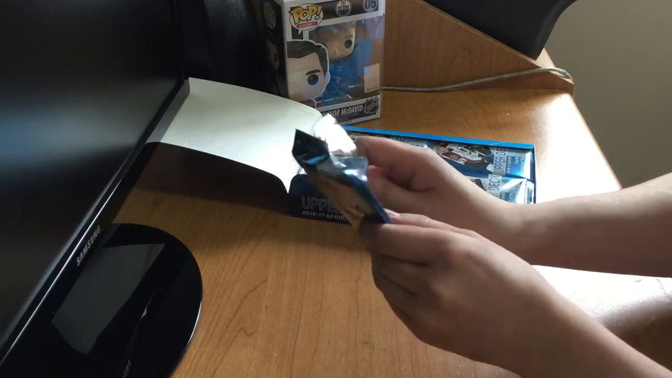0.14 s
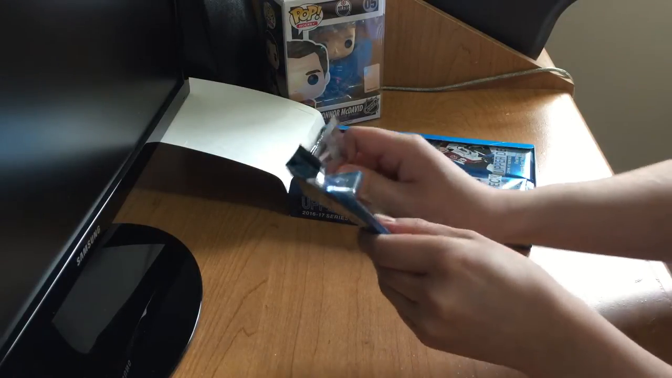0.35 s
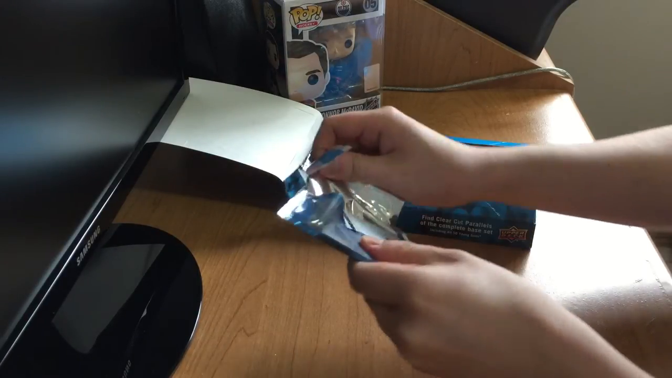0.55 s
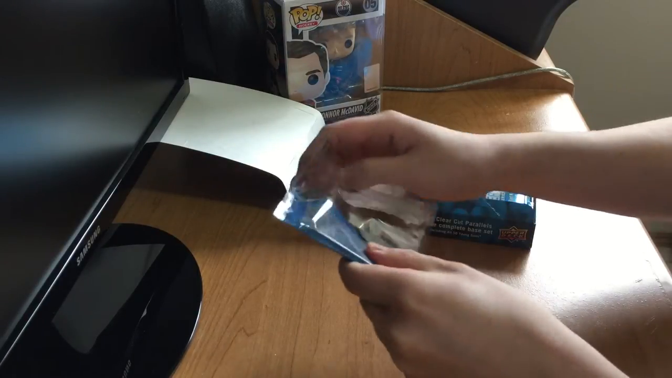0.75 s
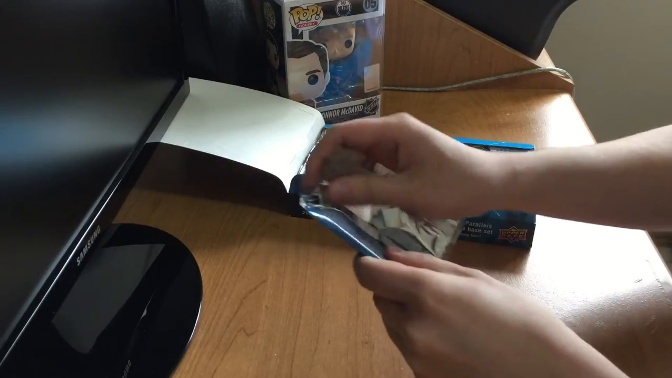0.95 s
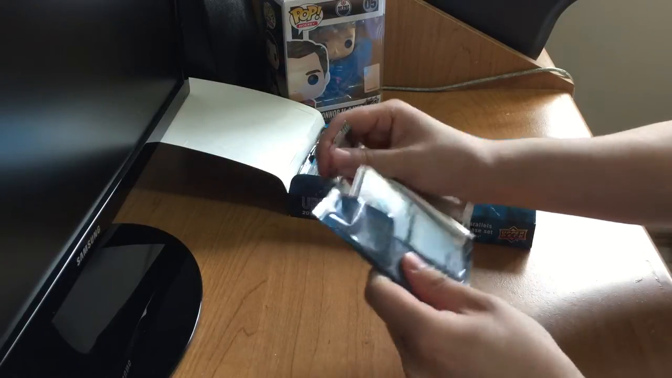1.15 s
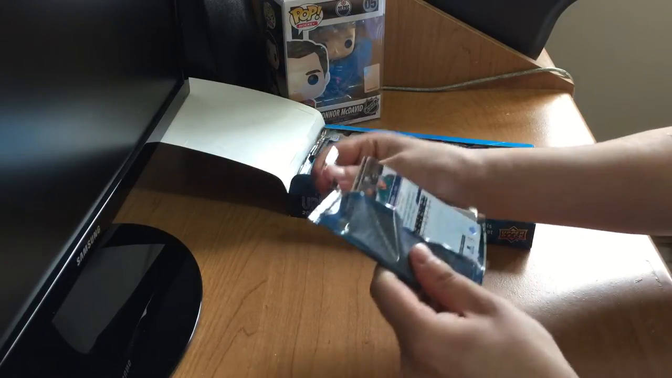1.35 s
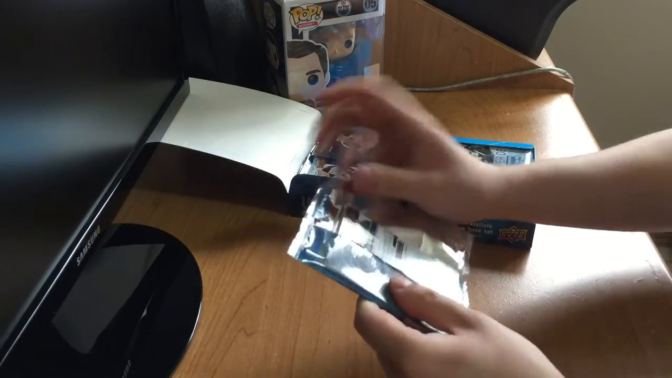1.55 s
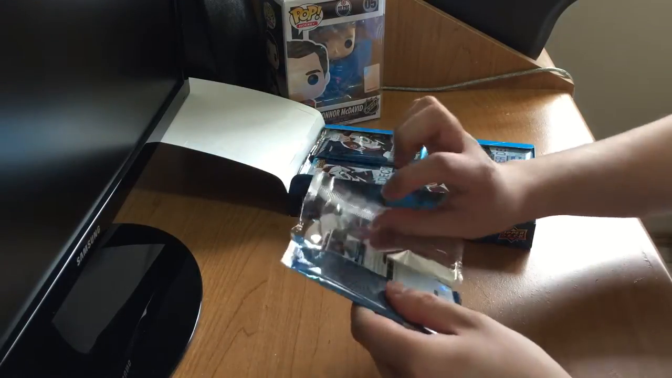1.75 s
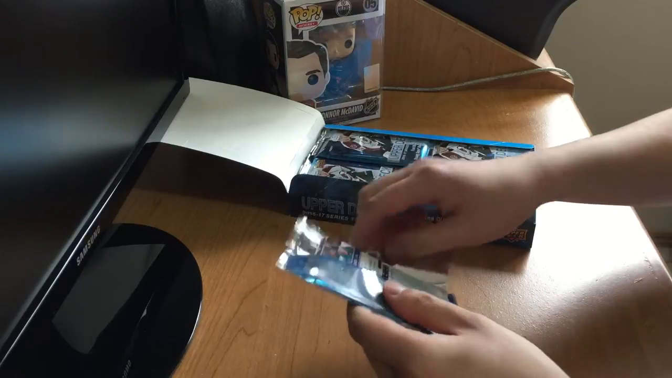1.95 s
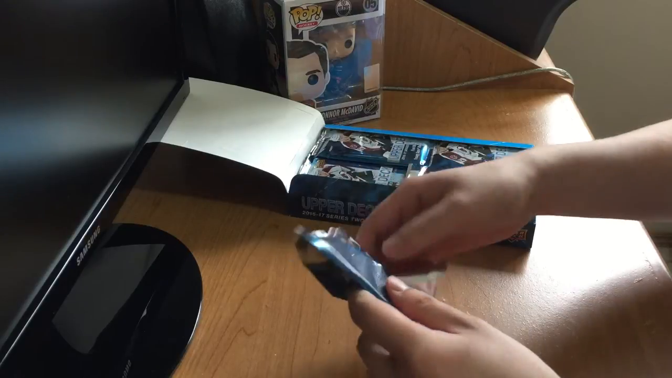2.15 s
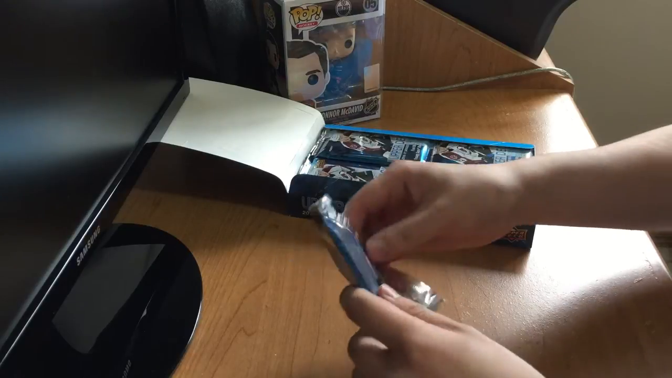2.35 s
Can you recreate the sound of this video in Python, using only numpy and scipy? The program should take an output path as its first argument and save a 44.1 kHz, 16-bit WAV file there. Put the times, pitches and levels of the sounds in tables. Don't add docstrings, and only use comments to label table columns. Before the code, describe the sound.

Thin foil wrapper crinkling, close and dry. From 0 to 0.7 s it is peeled: light crackles, then sharp bright snaps, brief metallic ringing and dense seam rips, strongest near 0.55 s. From 0.7 to 1.45 s, strong irregular snaps with soft low knocks of cards inside. After 1.5 s a few crisp snaps, near quiet around 1.85-2.1 s, then small crackles to 2.4 s. Small room, faint air.

```python
import sys
import numpy as np
from scipy import signal
from scipy.fft import rfft, irfft, next_fast_len
from scipy.io import wavfile

SR = 44100
rng = np.random.default_rng(int(sys.argv[2]) if len(sys.argv) > 2 else 0)


def file_out(sig):
    cols = np.atleast_2d(sig).T
    lim = np.clip(cols, -1, 1)
    pcm = np.round(lim * 32767).astype(np.int16)
    wavfile.write(sys.argv[1], SR, pcm)


def level_to_linear(level):
    exponent = np.asarray(level, float) / 20
    return 10 ** exponent


N = 105840

# t/s, peak level/dB, pouch thump over it level/dB,
# bright facets over it level/dB
CREASE_SNAPS = [(0.0395, -21, -16, -15), (0.0619, -22, -64, -12), (0.0721, -18, -25, -11),
                (0.0996, -16, -27.5, -15), (0.1385, -18, -24, -4), (0.1533, -21.5, -16.5, -6.5),
                (0.2195, -28.5, -15, 4), (0.2709, -4, -28.5, -18), (0.2733, -19, -31.5, 6),
                (0.3169, -14.5, -35, 0), (0.3872, -26, -55.5, -3), (0.402, -16, -18.5, -1),
                (0.438, -20, -50, 6), (0.518, -16, -13, -1), (0.5369, -3, -19, -7.5),
                (0.5487, -14.5, -8.5, -10), (0.554, -2.5, -21.5, -13), (0.5682, -14.5, -14.5, -23),
                (0.5783, -15.5, -8.5, -2), (0.5877, -4, -11, -5.5), (0.6277, -17, -11.5, -13.5),
                (0.6746, -31, -6, -2.5), (0.6956, -30, -8.5, 0.5),
                (0.7205, -31.5, -6, -4), (0.7271, -14.5, -11.5, -9), (0.7519, -16.5, -16.5, -40),
              (0.8084, -14.5, -16.5, -4.5), (0.8304, -7.5, -22, -9), (0.8404, -20, -9.5, -17),
              (0.849, -15, -26, -19), (0.8943, -16.5, -18, -1.5), (0.904, -16.5, -19.5, -1.5),
              (1.031, -13.5, -30, -13.5), (1.0344, -10.5, -30, -13), (1.0816, -32.5, -28, 3.5),
              (1.1237, -16, -17.5, -16), (1.1552, -15.5, -27, -14.5), (1.1698, -16, -25.5, -7.5),
              (1.2226, -12.5, -12, -14.5), (1.2266, -9.5, -23, -9.5), (1.2305, -16, -34, -5),
              (1.243, -17.5, -16, -4.5), (1.2619, -8, -18.5, -4.5), (1.2655, -15.5, -10.5, -34),
              (1.2825, -16, -22, -28), (1.3266, -21.5, -17.5, -8.5), (1.3573, -8.5, -21.5, -12.5),
              (1.3767, -21, -14, -7), (1.4203, -7.5, -16, -13),
                (1.5302, -12.5, -22, -8.5), (1.5424, -6, -25, -21), (1.5724, -19.5, -19.5, -2.5),
                (1.6192, -25, -49, 0.5), (1.6298, -17.5, -23, -8.5), (1.663, -34.5, -11.5, 2),
                (1.6759, -33.5, -19, 7), (1.6835, -32, -14.5, -1), (1.7446, -28.5, -27, -2),
                (1.7547, -17, -24, -10), (1.7745, -21, -19.5, -12.5), (1.795, -25.5, -19.5, -9.5),
                (1.853, -47.5, -10, 5), (1.951, -42, -17.5, -24), (2.0009, -57.5, -31, 4),
                (2.0894, -45, -9, -27), (2.1141, -35, -19, -3), (2.1283, -21.5, -29, -3),
                (2.136, -19.5, -20.5, -14), (2.1405, -15, -34, -6), (2.1532, -21.5, -30, 0.5),
                (2.279, -46.5, -10, 2.5), (2.2926, -15.5, -27.5, -15.5), (2.3214, -11, -36.5, -12.5),
                (2.38, -26, -39, -34), (2.3924, -18.5, -29, -21)]
# t/s, pitch f/Hz, peak level/dB
RINGING_FACETS = [(0.102, 4480.0, -22), (0.196, 980.0, -34), (0.238, 3270.0, -26.0), (0.2569, 920.0, -35),
                  (0.2729, 7750.0, -24), (0.2735, 1380.0, -31), (0.2736, 4650.0, -14),
                  (0.3163, 7060.0, -15.5), (0.3168, 4650.0, -17.5), (0.4026, 8440.0, -21),
                  (0.4101, 1030.0, -23.5), (0.4118, 3450.0, -19), (0.419, 6370.0, -26.0),
                  (0.438, 10850.0, -21), (0.439, 8270.0, -19), (0.467, 700, -35.5), (0.5373, 7240.0, -14),
                  (0.5378, 3450.0, -16), (0.538, 5680.0, -17.0), (0.5478, 6720.0, -23.0),
                  (0.555, 920.0, -22), (0.5647, 690.0, -21), (0.5787, 9300.0, -14), (0.5807, 10850.0, -23),
                  (0.5877, 2410.0, -11), (0.5877, 9130.0, -13), (0.595, 4480.0, -25.0),
                  (0.8087, 980.0, -27.5), (0.8087, 6030.0, -25), (0.8293, 8100.0, -17),
                  (0.832, 1490.0, -31), (0.8316, 2070.0, -19), (0.894, 8270.0, -19), (1.022, 5500, -44),
                  (1.0307, 3100.0, -20.5), (1.146, 3500, -31), (1.1495, 8500, -30), (1.1702, 3100.0, -21),
                  (1.185, 1000, -35.5), (1.209, 3000, -38), (1.2272, 8960.0, -27.0), (1.2631, 8100.0, -10),
                  (1.2791, 920.0, -31), (1.3759, 800.0, -31.5), (1.3957, 980.0, -32.0),
                  (1.3963, 1670.0, -28.5), (1.3993, 6890.0, -24.5), (1.4188, 1030.0, -22.5),
                  (1.4199, 2580.0, -14.5), (1.53, 4820.0, -26.0), (1.5316, 980.0, -31.0),
                  (1.7557, 980.0, -34.5), (1.993, 11000, -52), (2.1316, 920.0, -36.5), (2.154, 4480.0, -24),
                  (2.187, 4500, -44), (2.292, 4480.0, -22), (2.301, 4200, -40), (2.3209, 3100.0, -26.5)]
# t/s, length t/s, level/dB, pouch over
# it level/dB, centre of the band f/Hz
SEAM_RIPS = [(0.188, 0.024, -32, -14, 8100), (0.237, 0.026, -33.5, -38, 3600),
             (0.404, 0.032, -28, -10.5, 5700), (0.35, 0.0094, -40.5, -32.5, 7400),
             (0.496, 0.016, -31, -31, 13000), (.514, 0.023, -28, -8.5, 7400), (0.553, 0.02, -26.5, 1, 2700),
             (0.578, 0.01, -26.5, -8, 14000), (0.882, 0.01, -31, -11, 11400),
             (1.2635, 0.023, -36.5, -15, 5800), (1.3975, 0.019, -30, -11, 7700),
             (2.156, 0.038, -46.5, -4.5, 3000), (1.998, 0.018, -59.5, -27, 13000),
             (1.853, 0.053, -63.5, -21, 12000), (2.045, .025, -70.5, -15, 12000),
             (.042, 0.013, -42, -11, 4000), (.142, .03, -40.5, -19, 7500), (.445, 0.057, -39.5, -16, 12000),
             (2.325, 0.011, -44.5, -28, 6100)]
# t/s, level/dB
HAND_EFFORT = [(0, -49), (.13, -57.5), (.2, -41.5), (.36, -48), (.47, -44), (.7, -51.5), (.78, -59.5),
               (0.868, -50.5), (.97, -86), (1.031, -53), (1.1, -62), (1.16, -49), (1.44, -51.5),
               (1.51, -58), (1.72, -53), (1.84, -76), (2.27, -79.5), (2.4, -55.5)]
# t/s, pitch f/Hz, peak level/dB
CARD_BUMPS = [(0.199, 372, -46.5), (0.554, 322, -42), (0.585, 218, -43.5), (0.842, 350, -42),
              (0.897, 280, -43), (1.065, 590, -42.5), (1.155, 336, -46.5), (1.223, 248, -37.5),
              (1.261, 237, -47), (1.358, 238, -42), (1.3585, 3100, -28.5), (0.035, 160, -54),
              (0.586, 404, -40), (1.226, 370, -39), (1.755, 317, -52.5)]
# f/Hz, level/dB
FOIL_TONE = [(760, -30.5), (1300, -30.5), (1930, -1), (3890, 1.5), (7050, -2), (12600, -6), (15600, -9.5),
             (16500, -22.5)]
# f/Hz, level/dB
POUCH_TONE = [(150, -35.5), (300, -12.5), (480, -8), (650, -1.5), (950, 1), (1500, -6), (2300, -3.5),
              (3300, -24.5)]
# f/Hz, level/dB
SHEET_TONE = [(300, -50), (1500, -14), (1900, 0)]
# f/Hz, level/dB
LOW_CUT_TONE = [(70, -20), (170, 0)]
# f/Hz, t/s
ROOM_FADE = [(250, 0.14), (1000, 0.29), (3000, 0.15), (8000, 0.14), (15000, 0.099)]
# f/Hz, level/dB
AIR_TONE = [(30, -23), (60, -1), (220, 2), (500, -8.5), (1200, -14.5), (2500, -12), (15000, -39.5)]
# f/Hz, level/dB
MIC_TONE = [(15700, 0), (16300, -20), (17000, -50)]

DULL_HZ, SPLIT_HZ, TOP_HZ = 1900, 6000, 16000
LEAD_S = 0.005


def unit(x):
    return x / np.sqrt(np.mean(x ** 2) + 1e-20)


def along(points, hz):
    f, value = np.transpose(points)
    return np.interp(np.log(hz + 1), np.log(f + 1), value)


def coloured(x, points):
    m = 2 * next_fast_len(N)
    gain = level_to_linear(along(points, np.fft.rfftfreq(m, 1 / SR))) + 1e-4
    cepstrum = irfft(np.log(gain), m)
    cepstrum[1:m // 2] *= 2
    cepstrum[m // 2 + 1:] = 0
    response = np.exp(rfft(cepstrum))
    return irfft(rfft(x, m) * response, m)[:N]


def place(times, shapes):
    start = np.round(np.asarray(times) * SR).astype(int)[:, None]
    at = start + np.arange(shapes.shape[1])
    return np.bincount(at.ravel(), shapes.ravel(), N + SR)[:N]


def facets(rows, lo_hz, hi_hz, spread_db, count):
    ring_s, ring_cycles = 0.0012, 7
    rise_s, fall_s = 0.0004, 0.0012
    creep_s, creep_db = 0.002, -17
    t = np.arange(512) / SR
    u = rng.random((rows, 2, count, 1))
    hz = lo_hz + (hi_hz - lo_hz) * (np.arange(count)[:, None] + u[:, 0]) / count
    t60 = ring_s + ring_cycles / hz
    level_db = along(FOIL_TONE, hz) + spread_db * u[:, 1] - 60 * t / t60
    ring = np.sum(level_to_linear(level_db) * np.sin(2 * np.pi * hz * t), 1)
    late = t - LEAD_S - rise_s
    before = np.exp(late / rise_s) + level_to_linear(creep_db) * np.exp(late / creep_s)
    shape = np.where(late < 0, before, np.exp(-late / fall_s))
    grit = rng.standard_normal((rows, len(t)))
    jerk = grit * np.abs(grit) * shape
    out = signal.fftconvolve(ring, jerk, axes=1)
    return out / np.abs(out).max(1, keepdims=True)


def snaps():
    dull_db, bright_db, thump_db = -9, 5.5, 8
    thump_s = 0.02
    s, db, low_db, high_db = np.transpose(CREASE_SNAPS)
    dull = facets(len(s), DULL_HZ, SPLIT_HZ, spread_db=7, count=8)
    dull *= level_to_linear(db + dull_db)[:, None]
    bright = facets(len(s), SPLIT_HZ, TOP_HZ, spread_db=7, count=14)
    bright *= level_to_linear(db + high_db + bright_db)[:, None]
    foil = coloured(place(s - LEAD_S, dull + bright), SHEET_TONE)
    t = np.arange(1024) / SR
    push = rng.standard_normal((len(s), len(t))) * level_to_linear(-60 * t / thump_s)
    push *= level_to_linear(db + low_db + thump_db)[:, None] / np.linalg.norm(push, axis=1, keepdims=True)
    click_peak = np.abs(coloured(np.arange(N) == 0, POUCH_TONE)).max()
    return foil + coloured(place(s, push), POUCH_TONE) / click_peak


def pings():
    ring_s, ring_cycles, rise_s = 0.0065, 14.3, 0.0005
    s, hz, db = np.transpose(RINGING_FACETS)[:, :, None]
    t = np.arange(1024) / SR
    fade = level_to_linear(db - 60 * t / (ring_s + ring_cycles / hz))
    fade *= 1 - np.exp(-t / rise_s)
    return place(s[:, 0], fade * np.sin(2 * np.pi * hz * t))


def crackle(per_s, size_db):
    u = rng.random((12000, 4))
    s = np.cumsum(-np.log(u[:, 0])) / per_s
    inside = s < N / SR
    u, s = u[inside], s[inside]
    t = np.arange(96) / SR
    hz = DULL_HZ + (TOP_HZ - DULL_HZ) * u[:, 2:3]
    size = level_to_linear(np.minimum(-size_db * np.log(u[:, 1:2]), 13))
    t60 = 0.00082 + 5 / hz
    grains = size * level_to_linear(along(FOIL_TONE, hz) - 60 * t / t60) * np.sin(2 * np.pi * hz * t)
    taps = place(s, size * np.sign(u[:, 3:] - 0.5))
    foil = unit(coloured(place(s, grains), SHEET_TONE))
    return foil, unit(coloured(taps, POUCH_TONE))


def rips():
    rise_s, fade_to = 0.0023, 0.58
    wide, skirt_db, held_db = 2.55, -6, -6
    t = np.arange(N) / SR
    foil, pouch = crackle(per_s=4000, size_db=1.5)
    foil = coloured(foil, [(DULL_HZ, 0), (TOP_HZ, 5.5)])
    held = facets(len(SEAM_RIPS), DULL_HZ, TOP_HZ, spread_db=7, count=24)
    out = np.zeros(N)
    for (s, length, db, low_db, hz), ring in zip(SEAM_RIPS, held):
        times = [s, s + rise_s, s + 0.77 * length, s + length]
        shape = level_to_linear(db) * np.interp(t, times, [0, 1, fade_to, 0])
        band = coloured(foil, [(hz / wide, 1.47 * skirt_db), (hz, 0), (hz * wide, skirt_db)])
        ringing = unit(signal.fftconvolve(band, ring)[:N])
        out += shape * (unit(band) + level_to_linear(held_db) * ringing + level_to_linear(low_db) * pouch)
    return out


def handling():
    pouch_db, slide_db = -9, -3
    s, db = np.transpose(HAND_EFFORT)
    effort = level_to_linear(np.interp(np.arange(N) / SR, s, db))
    foil, pouch = crackle(per_s=900, size_db=8.5)
    slide = unit(coloured(rng.standard_normal(N), FOIL_TONE))
    return effort * (foil + level_to_linear(pouch_db) * pouch + level_to_linear(slide_db) * slide)


def bumps():
    fade_cycles = 5.7
    s, hz, db = np.transpose(CARD_BUMPS)[:, :, None]
    t = np.arange(4096) / SR
    fade = level_to_linear(db - 60 * t * hz / fade_cycles)
    soft_start = (1 - np.exp(-t * hz)) ** 2
    return place(s[:, 0], 10 * fade * soft_start * np.sin(2 * np.pi * hz * t))


def room(x, count=24):
    delay = round(0.002 * SR)
    out = np.zeros(N + 2 * SR)
    step = -(-N // count)
    for k in range(count):
        hz, t, z = signal.stft(rng.standard_normal(SR // 2), SR, nperseg=128)
        fade = level_to_linear(-60 * t / along(ROOM_FADE, hz)[:, None])
        tail = signal.istft(z * fade, SR, nperseg=128)[1]
        piece = x[k * step:][:step]
        wet = signal.fftconvolve(piece, tail / np.linalg.norm(tail))
        out[k * step + delay:][:len(wet)] += wet
    return out[:N]


def room_air():
    return level_to_linear(-69.5) * unit(coloured(rng.standard_normal(N), AIR_TONE))


def scene():
    room_db = -7
    foil = snaps() + pings() + rips() + handling() + bumps()
    foil = coloured(foil, LOW_CUT_TONE)
    return (foil + level_to_linear(room_db) * room(foil) + room_air())[None]


def band_limit(x):
    return signal.sosfilt(signal.butter(12, 16980, fs=SR, output="sos"), x)


def record(dry):
    mix = coloured(dry[0], MIC_TONE)[None]
    return band_limit(mix)


dry = scene()
out = record(dry)
file_out(out)
```